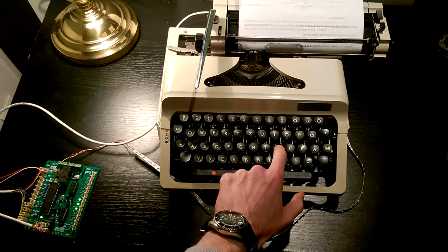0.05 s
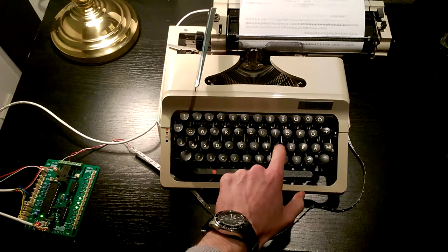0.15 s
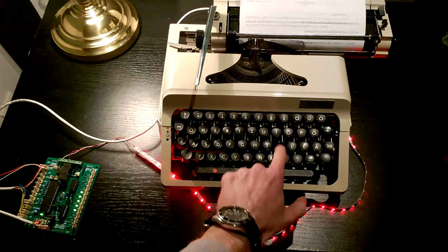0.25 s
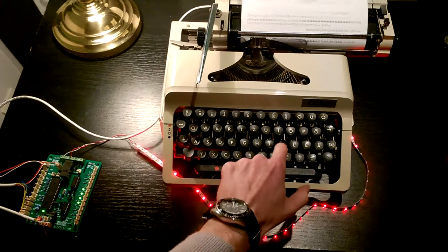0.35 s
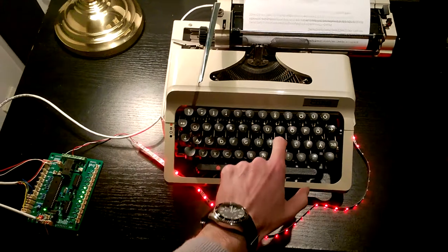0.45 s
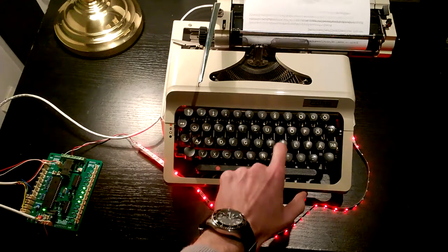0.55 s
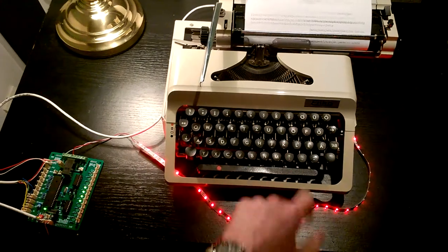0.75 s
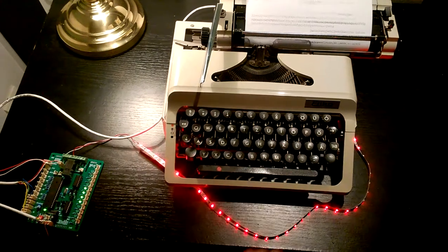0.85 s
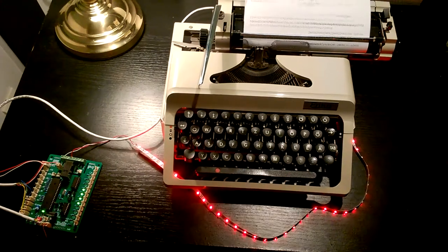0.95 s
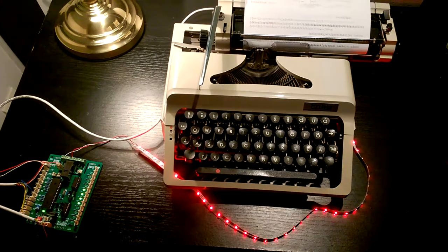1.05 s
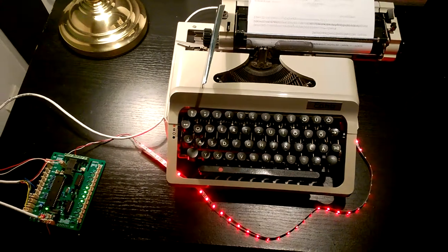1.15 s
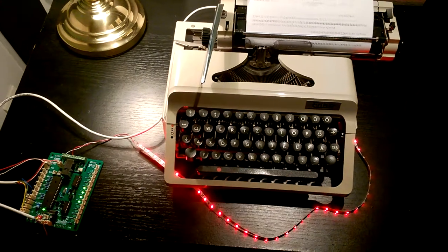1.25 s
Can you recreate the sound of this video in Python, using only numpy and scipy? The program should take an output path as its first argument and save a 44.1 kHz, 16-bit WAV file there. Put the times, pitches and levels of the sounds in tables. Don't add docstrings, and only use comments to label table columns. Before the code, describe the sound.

A single typewriter key struck once, a sharp metallic clack with carriage step in a quiet room

```python
import sys
import numpy as np
from scipy import signal
from scipy.fft import rfft, irfft, next_fast_len
from scipy.io import wavfile

SR = 44100
rng = np.random.default_rng(int(sys.argv[2]) if len(sys.argv) > 2 else 0)


def master(y):
    cut = np.clip(np.atleast_2d(y).T, -1, 1)
    pcm = np.round(cut * 32767)
    wavfile.write(sys.argv[1], SR, pcm.astype(np.int16))


def field_ratio(decibels):
    return 10 ** (np.asarray(decibels, dtype=float) / 20)


N = 57330


def unit(x):
    return x / np.sqrt(np.mean(x ** 2) + 1e-20)


def along(points, hz):
    f, v = np.transpose(points)
    return np.interp(np.log(hz + 1), np.log(f + 1), v)


def filtered(x, response):
    m = next_fast_len(len(x) + 8192)
    return irfft(rfft(x, m) * response(np.fft.rfftfreq(m, 1 / SR)), m)[:len(x)]


def add(track, s, x):
    part = track[max(round(s * SR), 0):][:len(x)]
    part += x[:len(part)]


def resonant(peaks, f):
    total = 0
    for k, (centre, width, db) in enumerate(peaks):
        total = total + (-1) ** k * field_ratio(db) * 1j * f * width / (centre ** 2 - f ** 2 + 1j * f * width)
    return total


def struck(hits, modes, attack_s):
    scatter_db, detune = 2, 0.01
    out, t = np.zeros(N), np.arange(SR // 4) / SR
    for s, db in hits:
        ring = np.zeros(len(t))
        for hz, level, t60 in modes:
            louder, sharper = rng.standard_normal(2)
            decay = field_ratio(level + scatter_db * louder - 60 * t / t60)
            ring += decay * np.sin(2 * np.pi * hz * (1 + detune * sharper) * t)
        add(out, s, field_ratio(db) * ring * (1 - np.exp(-t / attack_s)))
    return out


def rough_grit(hold):
    jumps = field_ratio(4 * rng.standard_normal(N // hold + 1))
    return rng.standard_normal(N) * jumps.repeat(hold)[:N]


def swells(events):
    t, out = np.arange(N) / SR, np.zeros(N)
    for s, length, hz, db in events:
        swell = np.exp(-((t - s) / (0.4 * length)) ** 2)
        out += field_ratio(db) * swell * np.cos(2 * np.pi * hz * (t - s))
    return out


# frequency in Hz, level in dB
RUMBLE = [(15, -14), (28, 0), (53, -2.5), (75, -6), (110, -20), (200, -73.5)]
AIR = [(90, 1), (180, -15.5), (420, -23.5), (700, -31.5), (5500, -38), (7500, -50), (12000, -45.5),
       (16000, -52)]
# frequency in Hz, level in dB
FAN = [(146, -72), (207, -68), (417, -77.5)]


def background():
    rumble_db, air_db = -47.5, -55
    t = np.arange(N) / SR
    rumble = unit(filtered(rng.standard_normal(N), lambda f: field_ratio(along(RUMBLE, f))))
    air = unit(filtered(rng.standard_normal(N), lambda f: field_ratio(along(AIR, f))))
    fan = np.zeros(N)
    for hz, db in FAN:
        waver = np.cumsum(rng.normal(0, 0.02, N))
        fan += field_ratio(db) * np.sin(2 * np.pi * hz * t + waver)
    return field_ratio(rumble_db) * rumble + field_ratio(air_db) * air + fan


# middle in seconds, length in seconds, pitch in Hz, level in dB
TREMORS = [(.002, 0.029, 38.8, -34.5), (0.074, 0.03, 55.3, -52), (0.698, .08, 27.5, -39.5),
           (0.919, 0.093, 36.15, -33), (0.999, 0.083, 48.2, -34.5), (1.1, 0.089, 40, -31.5),
           (1.19, 0.097, 35.3, -37.5), (1.277, 0.045, 30.3, -36)]


def floor():
    return swells(TREMORS)


# frequency in Hz, t60 in seconds
ROOM = [(200, 0.8), (600, .5), (1400, 0.56), (3700, 0.5), (7000, 0.56), (12000, 0.32)]
# frequency in Hz, level in dB
ROOM_COLOUR = [(200, 5), (700, 1.5), (1300, 2.5), (3800, 1.5), (8000, -2.5), (15000, -3.5)]


def room(x):
    wall_s = 0.0013
    hz, t, z = signal.stft(rng.standard_normal(SR), SR, nperseg=256)
    decay_db = along(ROOM_COLOUR, hz)[:, None] - 60 * t / along(ROOM, hz)[:, None]
    tail = signal.istft(z * field_ratio(decay_db), SR, nperseg=256)[1]
    tail = tail * (1 - np.exp(-np.arange(len(tail)) / SR / wall_s))
    return signal.fftconvolve(x, tail / np.linalg.norm(tail))[:N]


# middle in seconds, length in seconds, pitch in Hz, level in dB
SHIVERS = [(0.179, 0.12, 59.4, -40), (0.226, 0.0403, 60.02, -38), (0.258, .05, 67, -27.5),
           (0.281, 0.05, 72.1, -23), (0.298, 0.033, 71, -30), (0.338, 0.064, 93.5, -34),
           (.394, 0.041, 75, -25), (0.424, 0.064, 74.7, -28), (0.524, 0.071, 83.8, -31.5),
           (.567, 0.063, 36, -32)]


def desk():
    return swells(SHIVERS)


# start in seconds, level in dB
KNOCKS = [
    (.209, -42),
    (.2145, -27.5),
    (0.363, -36),
    (0.375, -32.5),
    (0.4381, -41),
    (.449, -33),
]
# frequency in Hz, level in dB, t60 in seconds
CASE = [(139.9, -10.5, .08), (188, -16.5, 0.051), (227.6, -10.5, 0.068), (270.8, 0.5, 0.097),
        (371.4, -6, 0.089), (428, -5, .06), (570, -7, 0.069), (1003, -18, 0.079)]


def case_knocks():
    return struck(KNOCKS, CASE, 0.0015)


# frequency in Hz, width in Hz, level in dB
PANELS = [(140, 46, 3), (186, 55, 0.5), (232.3, 50, -1), (355, 70, -0.5), (430, 80, -3.5), (583, 49, -8)]


def shudder():
    shudder_db, t60, rise_s = -13.5, 0.45, 0.0066
    t, size = np.arange(N) / SR, np.zeros(N)
    for s, db in KNOCKS:
        since = np.maximum(t - s, 0)
        size += field_ratio(db + shudder_db - 60 * since / t60) * (1 - np.exp(-since / rise_s))
    shaking = filtered(rng.standard_normal(N), lambda f: resonant(PANELS, f) / (1 + 1j * f / 700))
    return size * unit(shaking)


# start in seconds, level in dB
SPRING = [
    (.166, -55),
    (.1738, -59.5),
    (.1778, -61.5),
]


def spring():
    return struck(SPRING, [(5600, 0, 0.03)], 0.0008)


# start in seconds, level in dB, scrape length in seconds, tilt in dB per octave
LEVERS = [(.154, -64.5, 0.0095, -4), (0.196, -42, 0.0029, 0), (.2055, -28.5, 0.0093, -2),
          (0.2132, -28, 0.016, 3.5), (0.2215, -21.5, 0.0022, -1), (0.244, -37.5, .015, 2),
          (.367, -31, 0.0072, -0.5), (.376, -40, 0.0086, -4), (0.387, -47.5, 0.02, 2.5),
          (.423, -49, 0.029, 10), (.4258, -32.5, 0.0061, -2.5), (0.437, -36.5, 0.0039, -6),
          (.443, -34, 0.0073, -3), (0.463, -47.5, 0.0086, -10)]
# frequency in Hz, width in Hz, level in dB
FRAME = [(1050, 255, -5.5), (1944, 430, -1.5), (2745, 730, -2), (3630, 700, -1), (4787, 950, -2),
         (6200, 1500, -7), (9000, 1240, -15.5), (11270, 2000, -18), (14600, 1200, -27)]


def levers():
    out, t = np.zeros(N), np.arange(SR // 10) / SR
    for s, db, length, tilt_db in LEVERS:
        shape = np.exp(-(t / length) ** 1.6) * (1 - np.exp(-t / 0.001))
        grit = rng.standard_normal(len(t)) * shape
        burst = filtered(grit, lambda f: field_ratio(tilt_db * np.log2((f + 50) / 3000)) * resonant(FRAME, f))
        add(out, s, field_ratio(db) * burst / np.sqrt(np.sum(burst ** 2) / (length * SR)))
    return out


# frequency in Hz, width in Hz, level in dB
PIVOT = [(1715, 330, -3.5), (2500, 350, -0.5), (5743, 650, -5.5)]


def creak():
    start_s, end_s, last_db, rise_db_per_s = 0.178, 0.207, -44.5, 599
    t = np.arange(N) / SR
    swing = field_ratio(last_db + rise_db_per_s * np.minimum(t - end_s, 0)) * (t > start_s) * (t < end_s)
    return unit(filtered(rough_grit(40), lambda f: resonant(PIVOT, f))) * swing


# time in seconds, level in dB
SLIDE = [
    (.214, -50),
    (.225, -34.5),
    (.26, -35),
    (.3, -40),
    (.345, -42.5),
    (.362, -43),
    (.375, -59),
]
# frequency in Hz, width in Hz, level in dB
RAIL = [(802, 400, -9.5), (3000, 1300, -0.5), (4470, 1300, 1), (8000, 2500, -14), (11450, 2500, -18)]


def carriage():
    t = np.arange(N) / SR
    level_db = np.interp(t, *np.transpose(SLIDE), left=-120, right=-120)
    return unit(filtered(rough_grit(60), lambda f: resonant(RAIL, f))) * field_ratio(level_db)


# start in seconds, level in dB
LANDING = [
    (.4265, -50),
    (.4385, -40),
    (.4445, -47.5),
]
# frequency in Hz, level in dB, t60 in seconds
REST = [(1056, -4, 0.056), (3020, -14, 0.016), (8750, -20, .1), (11800, -14, .03), (14500, -14, .05)]


def landing():
    return struck(LANDING, REST, 0.0005)


# start in seconds, level in dB
JOLTS = [
    (.2085, -30.5),
    (.2136, -15),
    (.2172, -16.5),
    (.219, -24),
    (.2275, -30),
    (.232, -25),
    (.2345, -28),
]
# frequency in Hz, level in dB, t60 in seconds
ROLLER = [(1950, -6, .022), (2350, 0, .028), (2560, -5, .02), (3650, -8, .015)]


def roller():
    return struck(JOLTS, ROLLER, 0.0003)


# start in seconds, level in dB
SLAPS = [
    (0.2134, -4.5),
    (0.2209, -21.5),
]
# frequency in Hz, level in dB, t60 in seconds
BAR = [(2784, -7, 0.024), (3280, -11.5, 0.015), (3956, -9, 0.02), (4950, -0.5, 0.012), (5050, -6.5, 0.0064),
       (6200, -13.5, .012), (7950, -9, 0.015), (9920, -30, 0.018), (11550, -15.5, 0.0053)]


def type_bar():
    return struck(SLAPS, BAR, 0.00044)


def paper():
    crack_db, t60 = -16.5, 0.01
    crack, t = np.zeros(N), np.arange(SR // 20) / SR
    for s, db in SLAPS:
        add(crack, s, field_ratio(db + crack_db - 60 * t / t60) * rng.standard_normal(len(t)))
    return filtered(crack, lambda f: (1j * f / (2200 + 1j * f)) ** 2 / (1 + 1j * f / 6000))


def scene():
    metal_send_db, crack_send_db, case_send_db, wet_db = -20, 16, -12, -4
    rings = type_bar() + roller() + spring()
    crack = paper()
    scrapes = levers() + creak() + carriage() + landing()
    case = case_knocks()
    send = field_ratio(metal_send_db) * rings + field_ratio(crack_send_db) * crack + scrapes + field_ratio(case_send_db) * case
    machine = rings + crack + scrapes + case + shudder()
    return (machine + field_ratio(wet_db) * room(send) + desk() + floor() + background())[None]


def band_limit(x):
    return signal.sosfilt(signal.butter(12, 16150, fs=SR, output="sos"), x)


def record(dry):
    mix = filtered(dry[0], lambda f: np.clip((16100 - f) / 300, 0, 1))[None]
    return band_limit(mix)


dry = scene()
out = record(dry)
master(out)
```